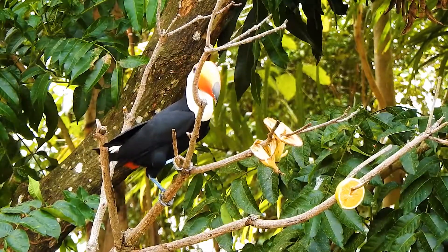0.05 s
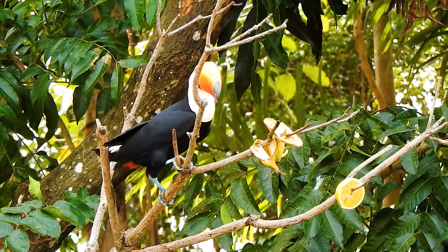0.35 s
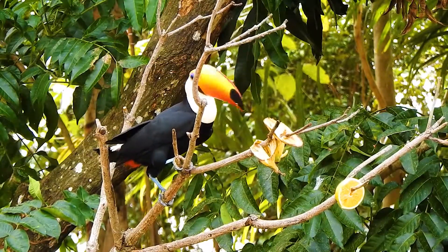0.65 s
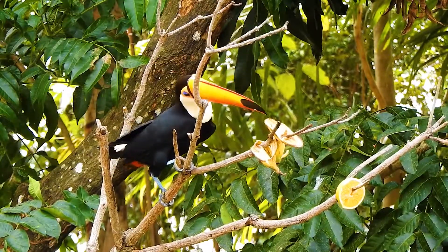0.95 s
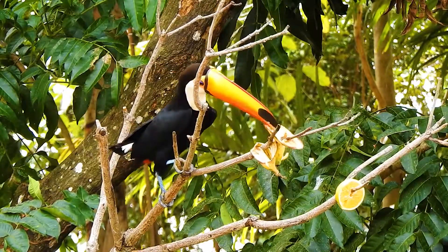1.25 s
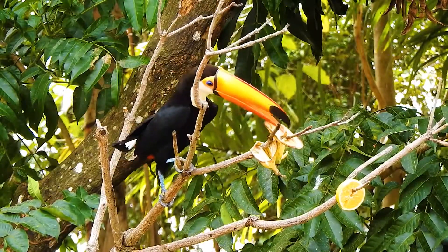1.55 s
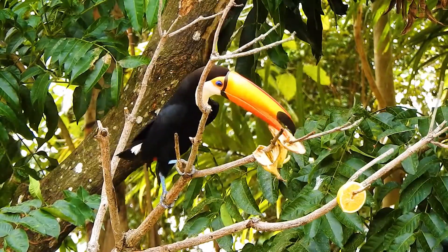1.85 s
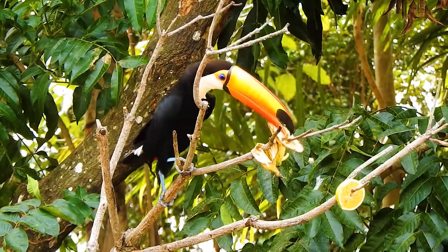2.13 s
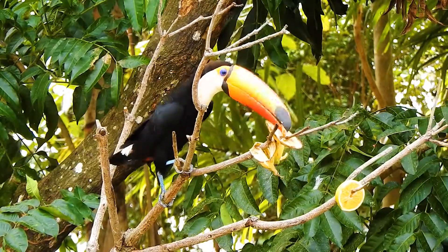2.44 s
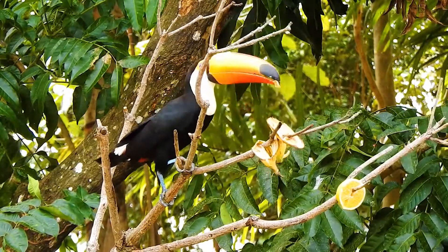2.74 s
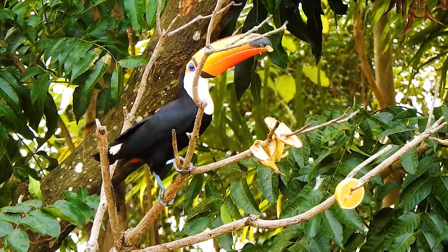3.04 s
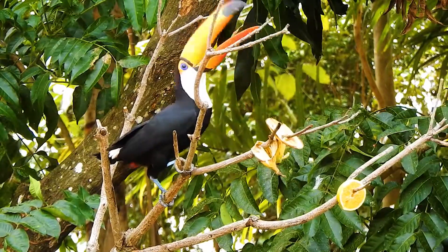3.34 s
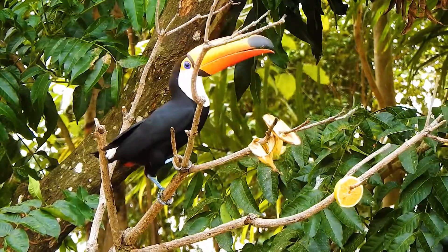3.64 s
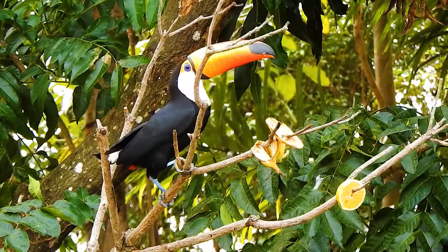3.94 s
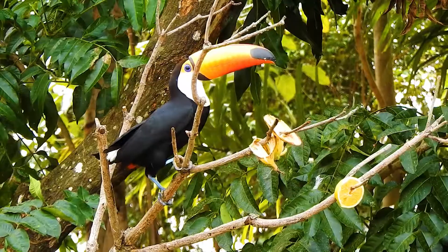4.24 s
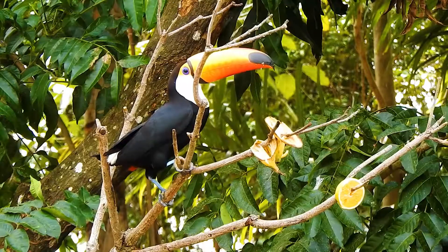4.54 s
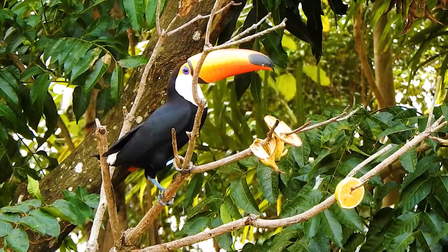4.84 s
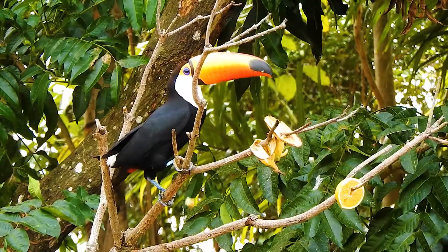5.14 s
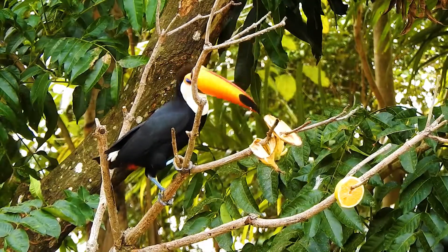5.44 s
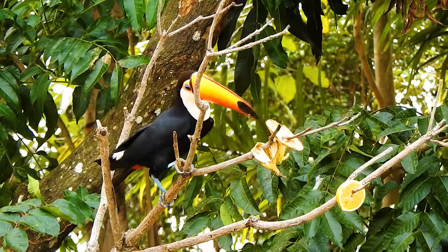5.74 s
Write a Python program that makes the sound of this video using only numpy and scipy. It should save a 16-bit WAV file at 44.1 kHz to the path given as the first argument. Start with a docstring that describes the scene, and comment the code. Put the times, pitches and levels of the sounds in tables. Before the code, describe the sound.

A toucan in front of the microphone makes three brief, raspy croaks at uneven intervals, each a quick rattle that slows and swells. Just before the second, a bird to the left gives a quiet nasal grunt and a shrill, fluttering squawk. The calls carry a light garden echo. Far quieter behind them are a cricket trilling about once a second, a constant insect chorus, a few faint whistles and ticks, and a thin whine.

```python
"""A toucan gives three rattling croaks in a tropical garden: runs of syrinx pulses that slow and swell.
To the left a second bird grunts, then squawks, a fluttering membrane shaking its shrill tone.
A cricket trills in bouts of wing strokes over a steady insect chorus, faint whistles and a few ticks.
A wall and the trees echo. Underneath lie a thin electrical whine, a very high pulsing hiss,
the faint steady hiss of open air and a light breeze."""
import sys
import numpy as np
from scipy import signal
from scipy.fft import rfft, irfft, next_fast_len
from scipy.io import wavfile
from scipy.ndimage import map_coordinates

SR = 44100
rng = np.random.default_rng(int(sys.argv[2]) if len(sys.argv) > 2 else 0)


def to_wav(sig):
    """Store sig (one row per channel, or 1-D mono) as 16-bit WAV at the path in sys.argv[1].

    Samples outside -1..1 are clipped; the rate is SR.
    """
    pcm = np.clip(np.atleast_2d(sig), -1, 1) * 32767
    pcm = np.round(pcm).astype(np.int16)
    wavfile.write(sys.argv[1], SR, pcm.T)  # frames by channels


N = 254898
T = np.arange(N) / SR


# croaks: start t/s, pulse count, first gap/s, tone level/dB, tone build-up/s, rasp level/dB,
# first rasp cut/dB, last tone cut/dB, last rasp cut/dB, bill ring f/Hz, ring/dB re rasp, fizz/dB re rasp
TOUCAN_CROAKS = [(.368, 9, .0141, -26.5, 0.051, -34.5, 23, 13, 11.5, 2960, 1, -31),
                 (1.4375, 8, .0148, -25, .031, -35.5, 8, 1, 1.5, 2880, -7, -23),
                 (4.267, 8, .0151, -24.5, 0.044, -37.5, 11, 11.5, -0.5, 2895, -2, -17.5)]

def croak_pulses(slowing_s=.0015, soft_start_db=16, rasp_build_s=.024, slack_hz=1435, taut_hz=1630):
    """Pulses slow and swell, rising and clearing as the throat tightens; the last may fail."""
    for croak in TOUCAN_CROAKS:
        start, count, gap, tone_db, build_s, rasp_db, first_cut, tone_cut, rasp_cut, *bill = croak
        for k in range(count):
            age = k * gap + slowing_s * k * (k - 1) / 2
            last = k == count - 1
            taut = .5 + .5 * np.tanh((age - .049) / .014)
            tone = tone_db - soft_start_db * np.exp(-age / build_s) - last * tone_cut
            rasp = rasp_db - first_cut * np.exp(-age / rasp_build_s) - last * rasp_cut
            rough = blend(.65, .14, taut) + .05 * last * tone_cut
            hz = blend(slack_hz, taut_hz, taut) + rng.normal(0, 18)
            yield start + age, hz, tone, rasp, rough, *bill


# air through throat and bill: f/Hz, relative level/dB
RASP_SPECTRUM = [(900, -42), (1170, -18), (1380, 9.5), (2000, 2), (2450, -2), (3400, 1.5), (4750, -5),
                 (5400, -11.5), (7000, -19), (9000, -35.5)]
# air at the bill's edge: f/Hz, relative level/dB
FIZZ_SPECTRUM = [(5000, -21), (6500, -2), (8000, -3), (10000, 4.5), (11500, -3), (12800, -2), (15000, -10)]
# low flutter as a pulse closes: f/Hz, relative level/dB
CHEST_SPECTRUM = [(150, -39), (300, 5.5), (450, -5), (620, 2.5), (850, -5.5), (1030, 3.5), (1200, -7),
                  (2000, -50)]

def toucan(rise_s=.0022, fall_s=.0035, sag_hz=60, glide_hz=40, throat_cutoff_hz=1230):
    """Each syrinx opening lets out a few cycles of tone and a puff of rasp, and rings the bill."""
    voice, ring, puffs, fizz, chest = np.zeros((5, N))
    shake, flicker, quiver = wobble(450), wobble(600), wobble(300)
    for at_s, hz, tone_db, rasp_db, rough, ring_hz, ring_db, fizz_db in croak_pulses():
        near = np.abs(T - at_s) < .03
        t = T[near] - at_s
        pressure = hump(t, rise_s, fall_s)
        pitch_hz = hz - sag_hz * (.75 - pressure) + glide_hz * np.tanh(t / fall_s)
        tone = np.sin(cycle(pitch_hz) + 1.5 * rough * shake[near] + rng.uniform(0, 2 * np.pi))
        voice[near] += np.sqrt(2) * amp(tone_db) * pressure * tone * (1 + .5 * rough * flicker[near])
        leak = amp(-18) * hump(t, .015, .027)
        puff = amp(rasp_db) * (hump(t, .0032, .0039) + leak)
        puffs[near] += puff
        fizz[near] += amp(fizz_db) * puff
        bill = np.sin(2 * np.pi * ring_hz * t + .77 * quiver[near])
        ring[near] += np.sqrt(2) * amp(rasp_db + ring_db) * hump(t - .0012, rise_s, fall_s) * bill
        chest[near] += amp(rasp_db - 12) * hump(t - .0031, .0026, .0042)
    voice = filtered(voice, lambda hz: .5 + .5 * np.tanh((hz - throat_cutoff_hz) / 70))
    breath = puffs * noise(RASP_SPECTRUM) + fizz * noise(FIZZ_SPECTRUM)
    return voice + ring + breath + chest * noise(CHEST_SPECTRUM)


# second bird's throat: f/Hz, gain/dB
THROAT_RESPONSE = [(200, -32), (290, -17.5), (570, -9), (860, -14), (1150, -12.5), (1450, -1.5),
                   (1750, -8.5), (2000, -7.5), (2300, -19.5), (2650, -10.5), (3100, -35.5), (6000, -48)]

def grunt(start_s=1.046, attack_s=.007, hold_s=.048, fade_s=.0093, top_hz=294, source_db=-42.5):
    """A short nasal note with an arched pitch: harmonics and breath through the throat."""
    t = T - start_s
    hz = top_hz / (1 + ((t - .026) / .11) ** 2)
    envelope = np.clip(t / attack_s, 0, 1) * np.exp(-np.maximum(t - attack_s - hold_s, 0) / fade_s)
    phase = cycle(hz * (1 + .011 * wobble(400)))
    harmonics = sum(amp(along(THROAT_RESPONSE, k * hz)) * np.sin(k * phase + rng.uniform(0, 2 * np.pi))
                    for k in range(1, 15))
    return amp(source_db) * envelope * (harmonics + amp(-9) * noise(THROAT_RESPONSE))


# squawk contour: t/s, f/Hz, level/dB
SQUAWK_CONTOUR = [(1.276, 1950, -60), (1.280, 1958, -28), (1.294, 1930, -29.5), (1.304, 2217, -25.5),
                  (1.334, 2242, -25), (1.360, 2199, -25.5), (1.372, 1940, -35.5), (1.392, 1710, -48)]
# harmonics from the second up: relative level/dB
OVERTONES_DB = [-20, -30, -40, -39]
# hoarse air: f/Hz, relative level/dB
HOARSE_SPECTRUM = [(200, -27), (330, -4), (900, -14), (1700, -15), (2800, 16), (3500, -12), (4400, -3),
                   (5700, 3), (7000, 8.5), (8000, -4.5), (9400, 9), (10300, -13), (11800, 0), (15000, -26)]

def squawk(break_hz=2135, low_flutter_hz=354.6, shrill_flutter_hz=210.4, crack_s=1.362, under_hz=1390):
    """A membrane shakes a shrill tone over a weak lower note; pitch sets the register, the end cracks."""
    times, pitches, levels = np.transpose(SQUAWK_CONTOUR)
    hz, db = np.interp(T, times, pitches), np.interp(T, times, levels)
    sounding = (T > times[0]) & (T < times[-1])
    shrill = .5 + .5 * np.tanh((hz - break_hz) / 50)
    crack = np.clip((T - crack_s) / .009, 0, 1)
    phase = cycle(hz * (1 + .0068 * wobble(500))) + .9 * crack * wobble(900)
    flutter = cycle(blend(low_flutter_hz, shrill_flutter_hz, shrill) * (1 + .039 * wobble(200)))
    swing_rad = 1.6 * shrill * np.sin(flutter)
    overtones = sum(amp(level) * np.sin((k + 1) * phase + k * swing_rad)
                    for k, level in enumerate(OVERTONES_DB, 1))
    tremolo = 1 + blend(.59, .5, shrill) * np.cos(flutter)
    upper = amp(db) * tremolo * (np.sin(phase) + tremolo * overtones + amp(-24) * noise(HOARSE_SPECTRUM))
    undertone = (1 - crack) * np.sin(cycle(under_hz + 69.6 * shrill))
    breath = (amp(-7) + crack * amp(-3)) * noise(THROAT_RESPONSE)
    lower = amp(-45.5 - 12 * shrill) * (undertone + breath)  # choked by the shrill register
    return sounding * (upper + lower)


# trill bouts: start t/s, end t/s, level/dB
CRICKET_BOUTS = [(.44, .95, -53.5), (1.422, 1.99, -52.5), (2.482, 3.04, -54.5), (3.522, 4.048, -53),
                 (4.532, 5.088, -53), (5.596, 5.80, -54.5)]

def cricket(pitch_hz=6075, stroke_hz=35, droop_hz=45, scrape_rad=.42):
    """Each wing stroke sounds one scratchy syllable that droops in pitch."""
    level, stroke = np.zeros((2, N))
    clock = T + .0017 * wobble(12)
    for start, end, db in CRICKET_BOUTS:
        count = (clock - start) * stroke_hz
        bout = (count > 0) & (count < np.round((end - start) * stroke_hz))
        stroke[bout], level[bout] = count[bout] % 1, amp(db)
    phase = cycle(pitch_hz + droop_hz * (1 - 2 * stroke) + 20 * wobble(60)) + scrape_rad * wobble(450)
    return np.sqrt(2) * level * amp(1.4 * wobble(30)) * np.sin(np.pi * stroke) ** 2 * np.sin(phase)


# whistles (long rows), ticks (short rows): centre t/s, length/s, start f/Hz, end f/Hz, level/dB
WHISTLES_AND_TICKS = [(0.038, 0.13, 1740, 1866, -59.5), (0.035, 0.21, 4100, 3910, -61),
                      (0.275, 0.015, 2550, 2800, -57), (0.889, 0.016, 930, 980, -55.5),
                      (3.679, 0.014, 2600, 2660, -54), (5.39, 0.2, 1900, 2850, -68.5)]

def whistles_and_ticks():
    """Faint far whistles and a few short ticks or drips, each a gliding tone."""
    glides = np.zeros(N)
    for centre, length, start_hz, end_hz, db in WHISTLES_AND_TICKS:
        progress = np.clip((T - centre) / length + .5, 0, 1)
        phase = cycle(blend(start_hz, end_hz, progress)) + .96 * wobble(300)
        glides += amp(db) * np.sin(np.pi * progress) * np.sin(phase)
    return glides


# runs of hiss pulses: start t/s, end t/s, rate/Hz, level/dB
HISS_PULSE_RUNS = [(.125, 2.9, 9.17, -69), (2.985, 4.58, 8.14, -65), (5.05, 5.4, 6.9, -65),
                   (5.61, 5.8, 6.3, -66)]

def pulsing_hiss(width_s=.011):
    """A faint, very high hiss, several pulses a second."""
    pulses = sum(amp(db + rng.normal(0, 1.2)) * hump(T - start - k / rate, width_s, width_s)
                 for start, end, rate, db in HISS_PULSE_RUNS for k in range(int((end - start) * rate) + 1))
    return pulses * noise([(10500, -24), (12200, 1), (14300, -1), (15500, -25.5)])


# wall reflection: f/Hz, gain/dB
WALL_RESPONSE = [(500, -29), (2200, -14), (4700, -3.5), (7000, 1.5), (12000, -6.5)]

def wall_echo(x, delay_s=.081):
    """A nearby wall returns one bright echo."""
    return filtered(x, lambda hz: amp(along(WALL_RESPONSE, hz)) * np.exp(-2j * np.pi * hz * delay_s))


# reverberant tail: f/Hz, T60/s
GARDEN_T60 = [(200, 2.1), (1500, 1), (2200, 1.52), (3200, 1.1), (6000, 1.7), (12000, 0.19)]

def garden_echo(x, early_db, early_t60_s, onset_s=.0056):
    """Trunks and leaves scatter a quick echo, then a long faint tail."""
    hz, t, spectra = signal.stft(rng.standard_normal((2, SR)), SR, nperseg=256)
    decay = amp(-60 * t / along(GARDEN_T60, hz)[:, None]) + amp(early_db - 60 * t / early_t60_s)
    tail = signal.istft(spectra * decay * (1 - np.exp(-t / onset_s)), SR, nperseg=256)[1]
    tail /= np.linalg.norm(tail[0])
    return spread(signal.fftconvolve(x[None], tail, axes=1)[:, :N])


# massed insects: f/Hz, relative level/dB
CHORUS_SPECTRUM = [(3800, -23), (4400, -11.5), (4800, -5), (5500, -9.5), (5850, -6.5), (6150, -1.5),
                   (6450, -6), (6800, -17), (7600, -18.5)]

def insect_chorus(level_db=-58):
    """Far insects merge into a slightly wavering band of noise."""
    gain = amp(level_db + .72 * wobble(2.78) + .82 * wobble(40))
    return gain * spread([noise(CHORUS_SPECTRUM), noise(CHORUS_SPECTRUM)])


def whine(pitch_hz=15734, throb_hz=13.7, level_db=-72):
    """A thin electrical tone that throbs."""
    throb = 1 + .55 * np.sin(2 * np.pi * throb_hz * T)
    return np.sqrt(2) * amp(level_db) * throb * np.sin(2 * np.pi * pitch_hz * T)


# open air: f/Hz, relative level/dB
AIR_SPECTRUM = [(25, -4), (60, -8), (130, -1), (400, -1), (1000, -2), (2000, -5), (3500, -9), (8000, -18),
                (12000, -28), (15600, -48)]

def open_air(level_db=-61):
    """Faint, steady hiss from all round."""
    return amp(level_db) * spread([noise(AIR_SPECTRUM), noise(AIR_SPECTRUM)])


# gusts: centre t/s, half-width/s, level/dB
BREEZE_GUSTS = [(.83, .025, -71), (2.5, 0.02, -60.5), (2.65, .15, -73), (3.45, 0.23, -68)]

def breeze(calm_db=-75):
    """Light wind rumbles on the microphone, swelling in gusts."""
    wind = amp(calm_db) + sum(amp(db) * hump(T - s, width, width) for s, width, db in BREEZE_GUSTS)
    return wind * amp(1.5 * wobble(8)) * noise([(15, -3), (50, .5), (90, -2), (200, -24), (600, -74)])


# diffuse field: f/Hz, left-right coherence
COHERENCE = [(60, 0.98), (130, 0.97), (290, 0.77), (640, 0.048), (1410, 0.18), (3100, 0.49), (4800, 0.75),
             (6200, 0.69), (8000, 1), (12000, 1)]

def spread(pair):
    """Mix two unrelated signals into a diffuse stereo field."""
    angle = lambda hz: np.arccos(np.clip(along(COHERENCE, hz), -1, 1)) / 2
    mid, side = filtered(pair, lambda hz: np.array([np.cos(angle(hz)), np.sin(angle(hz))]))
    return np.array([mid + side, mid - side])


# second bird's direction: f/Hz, left minus right level/dB
LEFT_BALANCE = [(300, -1), (700, 3), (1300, 3.5), (2300, 9), (4700, 11), (7000, 4.5)]

def pan_left(x):
    """Pan by a level difference at each frequency."""
    return filtered(x, lambda hz: amp(np.outer([.5, -.5], along(LEFT_BALANCE, hz))))


def amp(db):
    """Decibels to gain."""
    return 10 ** (np.asarray(db) / 20)


def blend(a, b, share):
    """From a to b as share goes from 0 to 1."""
    return a + (b - a) * share


def hump(t, rise_s, fall_s):
    """A smooth swell peaking at t = 0."""
    return np.exp(-.5 * (t / np.where(t < 0, rise_s, fall_s)) ** 2)


def along(points, hz):
    """Read (f/Hz, value) points on a log axis."""
    freqs, values = np.transpose(points)
    return np.interp(np.log(hz + 1), np.log(freqs + 1), values)


def wobble(knots_hz):
    """A smooth random curve."""
    return map_coordinates(rng.standard_normal(int(N * knots_hz / SR) + 4), [T * knots_hz])


def cycle(hz):
    """Running phase of a changing frequency."""
    return 2 * np.pi * np.cumsum(hz) / SR


def filtered(x, response):
    """Apply a frequency response."""
    size = next_fast_len(N + SR // 4)
    return irfft(rfft(x, size) * response(np.fft.rfftfreq(size, 1 / SR)), size)[..., :N]


def noise(spectrum):
    """Coloured noise of rms 1."""
    x = filtered(rng.standard_normal(N), lambda hz: amp(along(spectrum, hz)))
    return x / np.sqrt(np.mean(x ** 2) + 1e-20)


def scene():
    """Toucan ahead, second bird left, cricket and faint sounds, with echoes and a steady background."""
    croaks = toucan()
    neighbour = grunt() + squawk()
    small_sounds = cricket() + whistles_and_ticks()
    direct = croaks + pan_left(neighbour) + small_sounds
    wall = wall_echo(neighbour + amp(-13.5) * croaks)
    trees = amp(-12.5) * garden_echo(croaks, early_db=12.5, early_t60_s=.19)
    trees += garden_echo(amp(-8) * neighbour + amp(-7) * small_sounds, early_db=6, early_t60_s=.15)
    return direct + wall + trees + pulsing_hiss() + whine() + open_air() + insect_chorus() + breeze()


def record(dry, top_hz=15850):
    """Nothing is kept above the band limit."""
    return filtered(dry, lambda hz: hz < top_hz)


dry = scene()
out = record(dry)
to_wav(out)
```